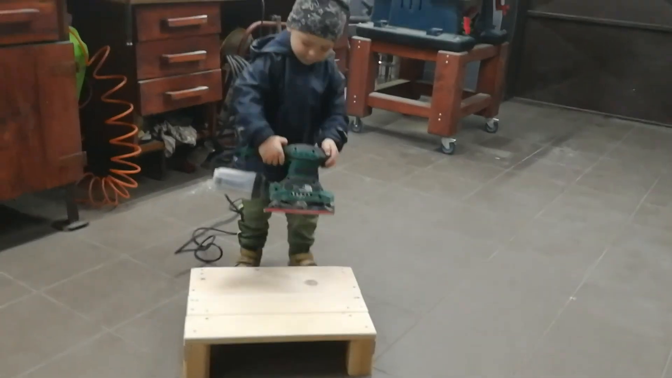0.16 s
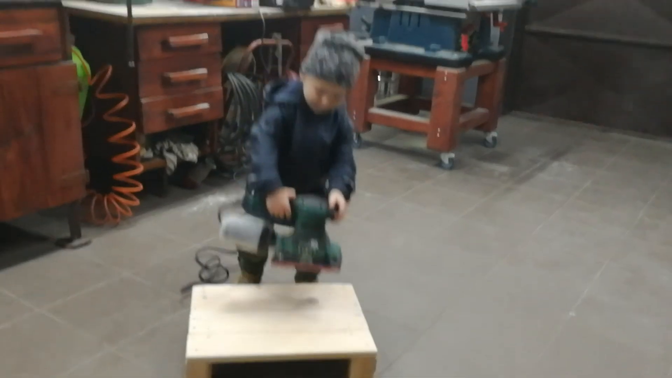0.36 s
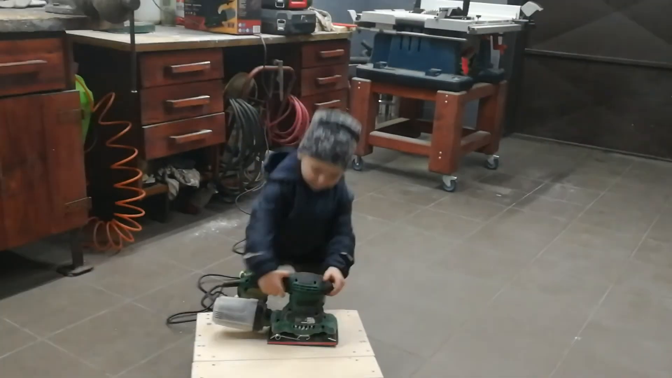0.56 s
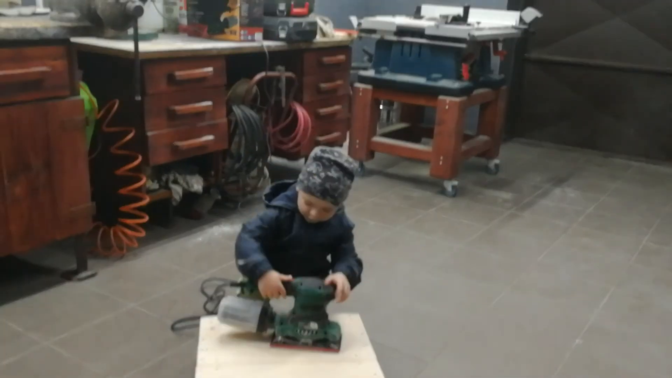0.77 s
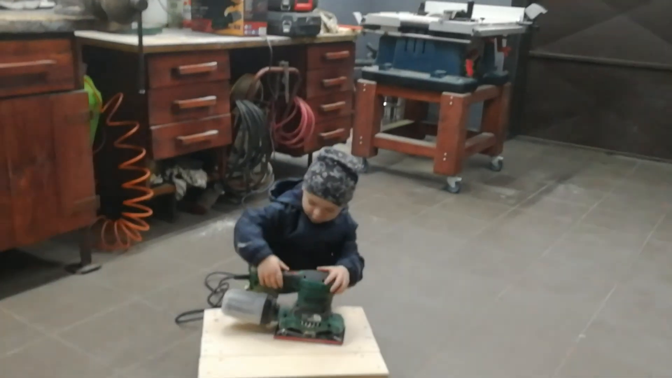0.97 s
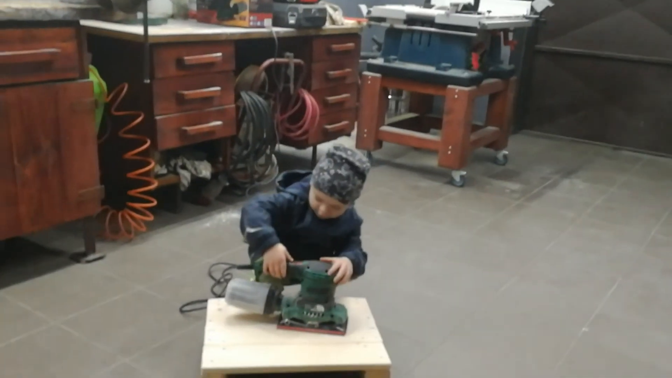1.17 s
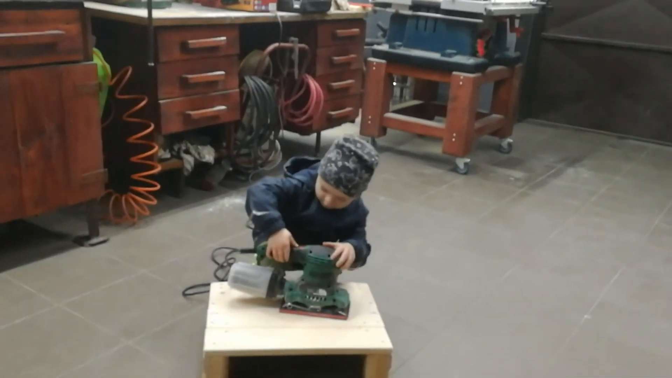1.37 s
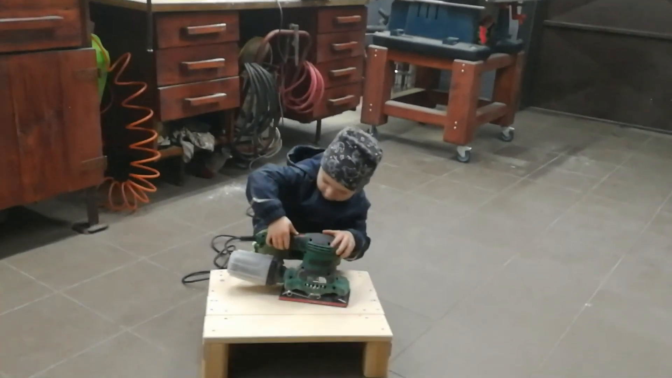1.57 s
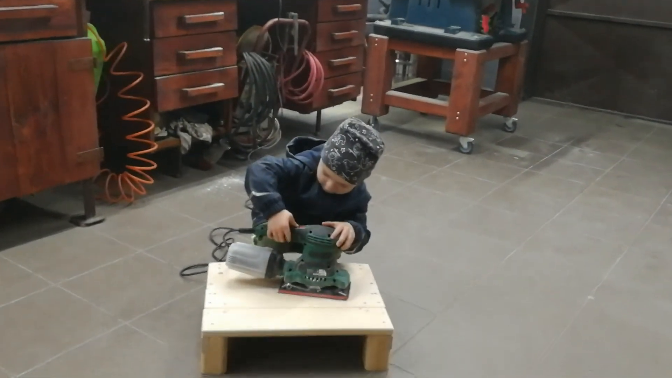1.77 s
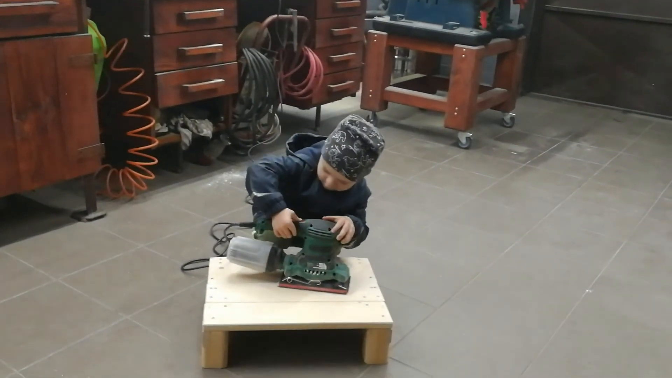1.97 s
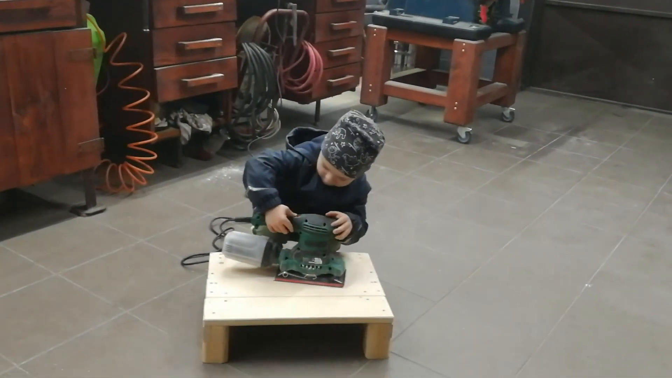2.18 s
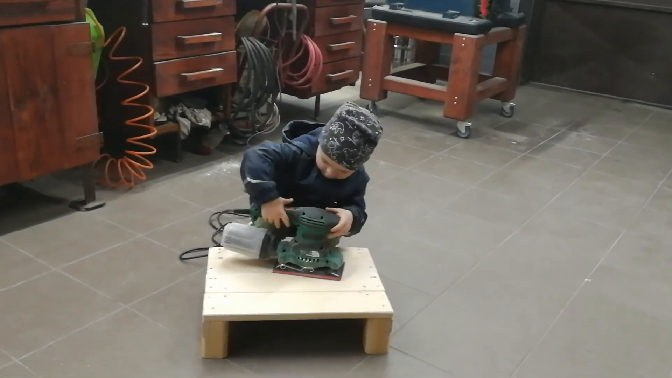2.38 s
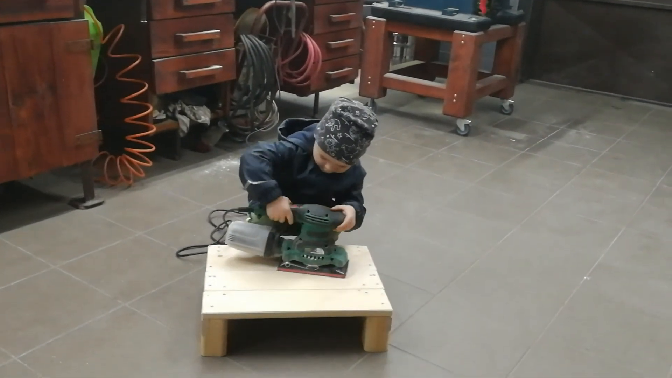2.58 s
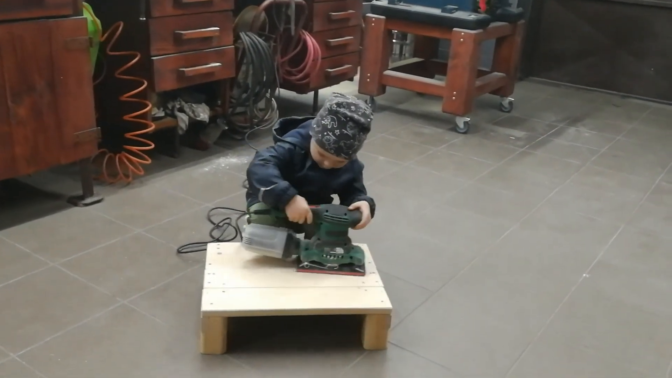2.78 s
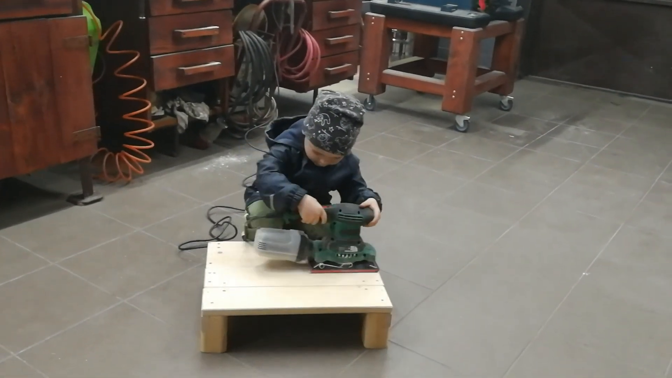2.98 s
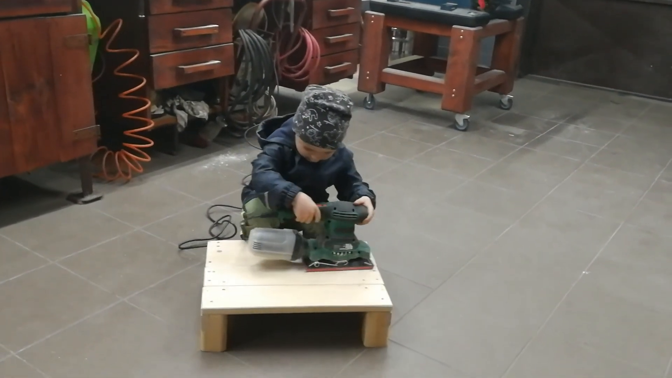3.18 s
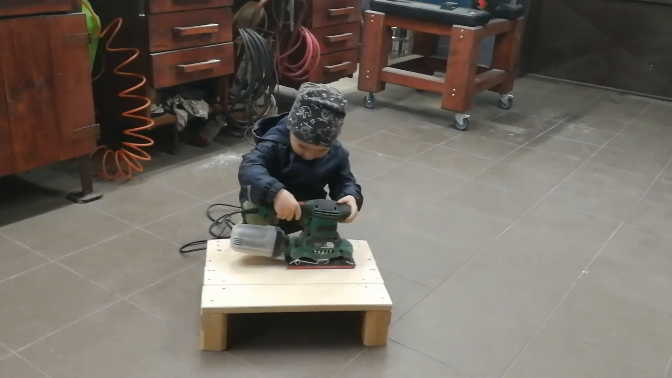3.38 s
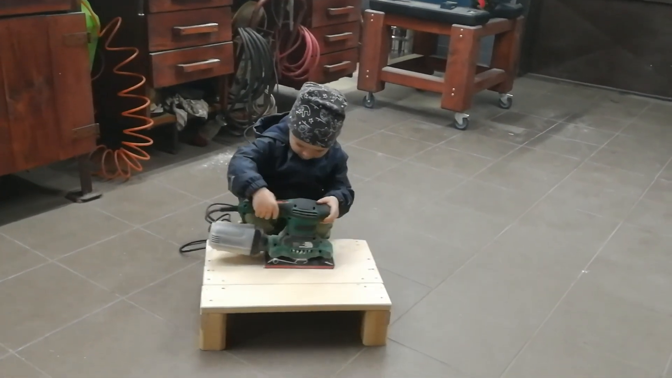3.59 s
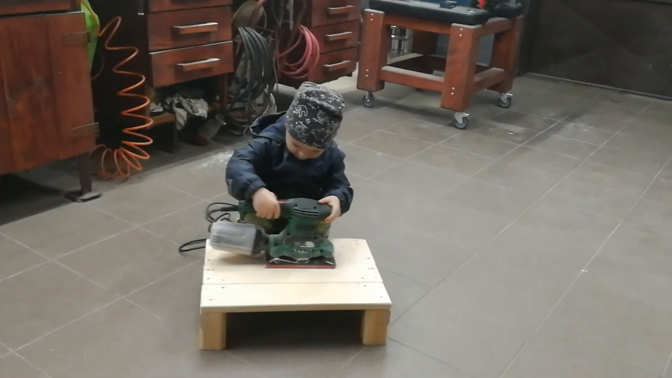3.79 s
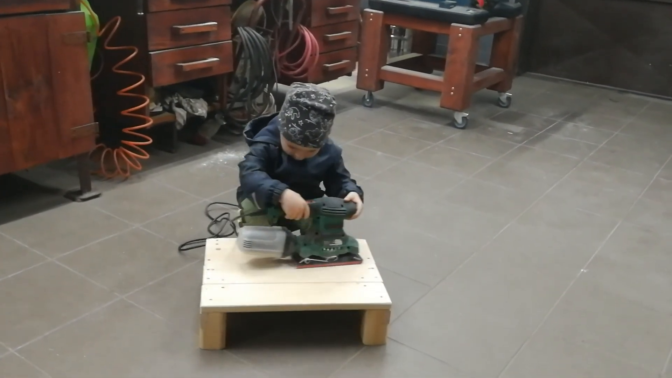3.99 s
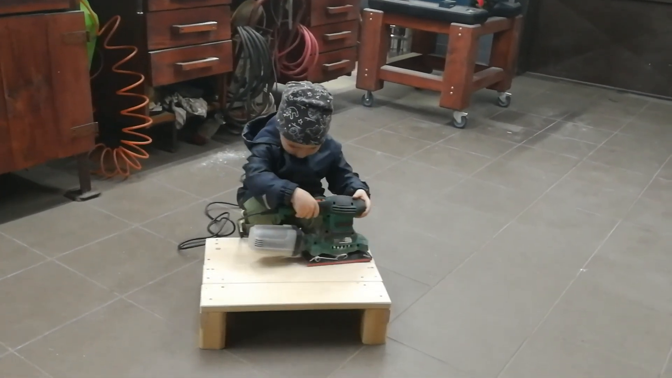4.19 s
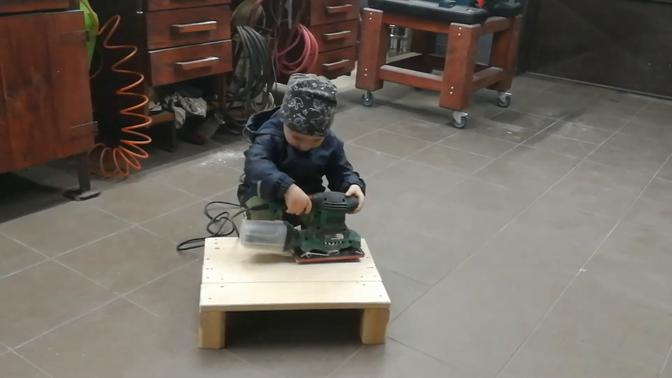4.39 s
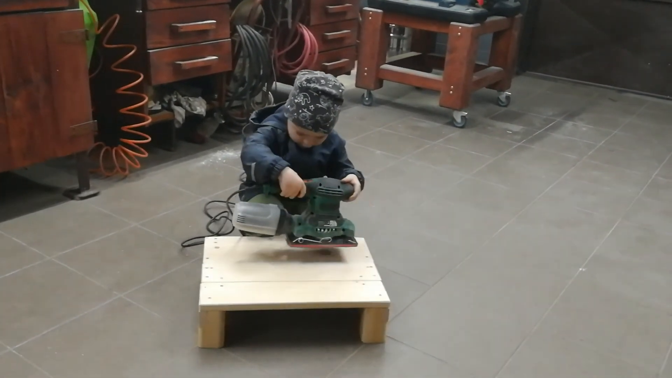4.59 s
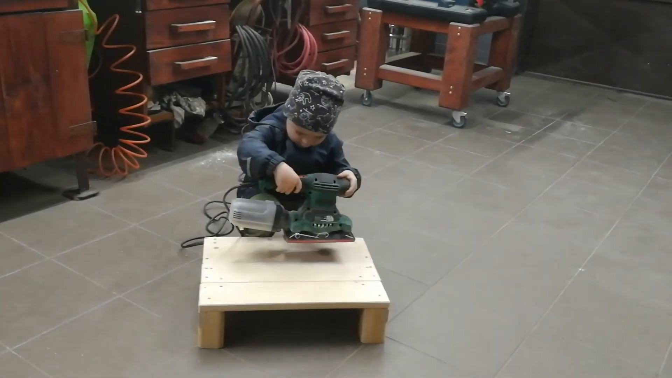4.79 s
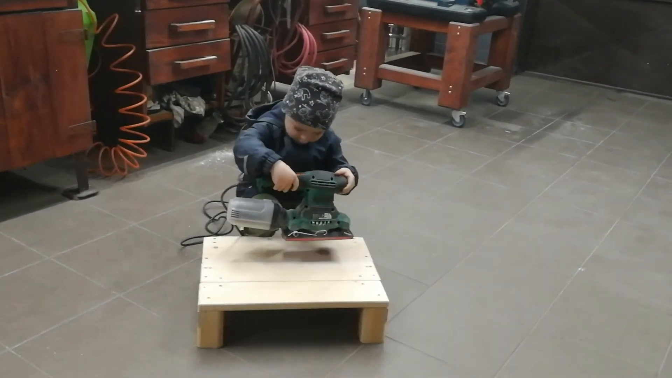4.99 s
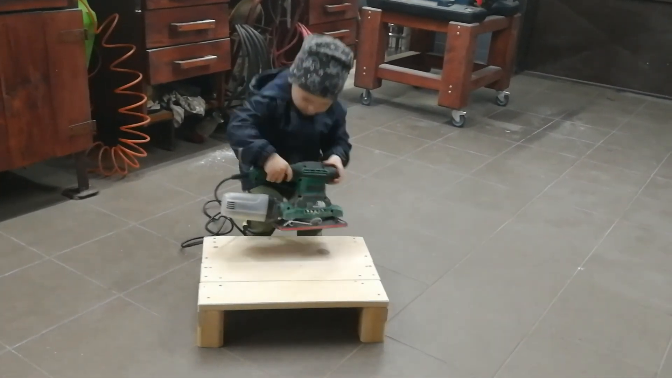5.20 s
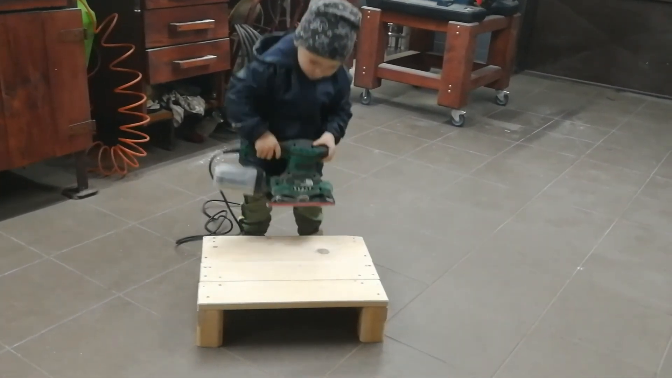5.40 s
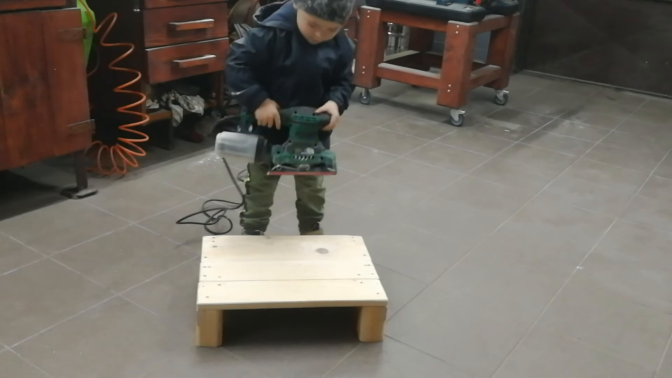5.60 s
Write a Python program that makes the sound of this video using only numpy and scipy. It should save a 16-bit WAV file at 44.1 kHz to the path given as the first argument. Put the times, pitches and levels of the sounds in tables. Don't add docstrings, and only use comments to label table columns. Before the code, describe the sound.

A phone about two metres away hears a jacket rustle, a small tap, then a power sander set on wood with a clack and hollow thud ringing in a tiled room. Quiet air follows. A crisp switch snap starts an uneven, clattering run-up that smooths into a bright, gritty buzz climbing in pitch. Once raised off the wood, the motor whirs freer and higher with a metallic rattle.

```python
import sys
import numpy as np
from scipy import signal
from scipy.fft import rfft, irfft
from scipy.io import wavfile
from scipy.ndimage import uniform_filter1d, map_coordinates

SR = 44100
rng = np.random.default_rng(int(sys.argv[2]) if len(sys.argv) > 2 else 0)


def inscribe(sig):
    pcm = np.round(np.clip(np.atleast_2d(sig).T, -1, 1) * 32767)
    wavfile.write(sys.argv[1], SR, pcm.astype(np.int16))


def attenuation_scalar(level_db):
    decades = np.asarray(level_db, float) / 20
    return 10 ** decades


N = 248724

# frequency in Hz, level in dB.
SNAP_SPECTRUM = [(120, -64.5), (200, -5.5), (401, -56), (762, -8), (1000, -17), (1480, 2), (1980, -7.5),
                 (2290, -1.5), (5520, -8), (8730, 0), (16000, -23.5)]
# frequency in Hz, level in dB.
SLAP_SPECTRUM = [(400, -26), (800, -8), (1200, -2), (1500, 0), (2000, -5), (3000, -18), (8000, -19),
                 (12000, -36)]
# frequency in Hz, level in dB.
SHOE_SPECTRUM = [(180, -35.5), (300, -2.5), (491, -14.5), (697, 2), (1450, -2), (2070, -3), (3500, -8.5),
                 (4550, -36), (7700, -120)]
# frequency in Hz, left-right coherence from 0 to 1.
COHERENCE = [(60, 0.98), (130, 0.99), (290, 0.89), (640, 0.43), (1400, 0.31), (3000, 0.045), (6500, 0.48),
             (10000, 0.13), (15000, 0.13)]


def motor():
    # time in seconds, shaft speed in Hz.
    run_up = [(2.0, 30.75), (2.18, 48.92), (2.3, 64.69), (2.39, 68.54), (2.49, 74.7), (2.58, 86.2),
              (2.7, 92.96), (2.81, 100.1), (2.9, 103.3), (3.01, 106.4), (3.33, 113.6), (3.58, 117.2),
              (3.9, 119.7), (4.28, 121.2), (4.43, 124), (4.52, 127.1), (4.9, 134.2), (5.2, 136.5),
              (5.64, 139.1)]
    t = np.arange(N) / SR
    speed = curve(run_up, 1, before=0)
    turns = np.cumsum(speed * (1 + 0.0009 * slow(30))) / SR
    lift_s, lift_fade_s = 4.33, 0.048
    lifted = .5 + .5 * np.tanh((t - lift_s) / lift_fade_s)
    wake_s, wake_db_per_s = 2.103, 100
    wake_db = -wake_db_per_s * np.maximum(wake_s - t, 0) - 60 * (t < 1.9)
    settled_db = -20 * np.clip((2.62 - t) / .12, 0, 1) + wake_db
    seated_s, seating_db_per_s = 3.11, 22
    blur_db = -seating_db_per_s * np.maximum(seated_s - t, 0)
    steady_db = settled_db + blur_db
    out = low_orders(turns, lifted, settled_db, blur_db)
    out += commutator(turns, speed, lifted, settled_db)
    out += high_orders(turns, steady_db)
    out += pad_chatter(turns, lifted, steady_db)
    out += pad_hops(turns)
    out += housing(turns, lifted, wake_db)
    out += fan(turns, speed, lifted, wake_db)
    out += paper_rasp(turns)
    out += paper_clamp(turns)
    return signal.sosfilt(signal.butter(4, 58, "high", fs=SR, output="sos"), out)


def low_orders(turns, lifted, settled_db, blur_db):
    on_wood_db = [-60.5, -50.5, -58.5, -57.5, -56, -50.5]
    in_air_db = [-53, -64, -60.5, -63.5, -61, -53.5]
    # time in seconds, peak in dB, rise in seconds, fall in seconds if other.
    passages = [
        [(2.37, -48, 0.3, 0.1), (2.5, -49, .16, 0.15), (3.5, -42, 0.16, .2), (4.45, -47.5, 0.28, 0.2),
         (4.82, -38.5, .2), (5.5, -42.5, 0.16, 0.3)],
        [(3, -36.5, .07, 0.09), (3.06, -43, 0.13), (3.33, -35, 0.12, 0.08), (4, -32.5, .36, .15),
         (4.86, -52, 0.18)],
        [(2.75, -45, 0.044), (3.37, -46.5, .08), (3.6, -51, .06), (3.89, -35.5, 0.09, .25), (5, -45, 0.15, 0.2),
         (5.434, -44.5, .22)],
        [(2.62, -46.5, 0.12), (2.87, -45, 0.043), (3.47, -46, .12), (5.5, -39, 0.26)],
        [(3.22, -52, 0.096), (3.96, -47.5, 0.085), (4.19, -41, 0.18, 0.13), (5.48, -48.5, .25)],
        [(3.4, -46, 0.24), (3.95, -44.5, 0.082), (4.33, -46, .09), (4.6, -44, 0.043), (4.9, -40, 0.24),
         (5.17, -45.5, 0.11), (5.5, -33.5, 0.27)],
    ]
    out = np.zeros((2, N))
    for k, spread in enumerate([0.16, 0.88, 0.88, .45, .42, .32]):
        rest_db = on_wood_db[k] + (in_air_db[k] - on_wood_db[k]) * lifted + settled_db
        rest_db = rest_db + blur_db * (k > 3)
        gain = attenuation_scalar(rest_db + 2.0 * slow(7.8)) + swells(passages[k])
        out += gain * tone(turns, k + 1, -.5, spread=spread, lean=.6)
    return out


def commutator(turns, speed, lifted, settled_db):
    # time in seconds, level in dB, half width in seconds.
    strain = [(2.61, -53, .04), (2.76, -51, .04), (2.87, -54, .07), (3.25, -54.5, 0.23), (4.0, -50, 0.23),
              (4.5, -51, 0.074), (4.75, -50, .1), (5.05, -45, 0.11), (5.3, -49, .06), (5.53, -48, .1)]
    wood_db, air_db = -50, -45.5
    bars_db = wood_db + (air_db - wood_db) * lifted + .5 * settled_db
    bars_db = 20 * np.log10(attenuation_scalar(bars_db) + swells(strain))
    whine = tone(turns + .006 * slow(35), 24, bars_db - 2.5 + 2 * slow(30), spread=.3)
    sparks = resonate(rng.standard_normal((2, N)), 24 * speed, 47)
    return whine + attenuation_scalar(bars_db - 4 + 3 * np.cos(2 * np.pi * turns)) * evened(sparks)


def high_orders(turns, steady_db):
    # multiple of shaft speed, relative level in dB.
    orders = [(7, -17), (8, -15.5), (9, -18), (10, -16), (11, -15), (12, -14.5), (13, -17), (14, -16),
              (15, -17.5), (16, -17), (17, -18), (18, -22), (19, -20), (22, -20), (23, -18), (25, -18)]
    # multiple of shaft speed, time in seconds, level in dB, half width in seconds.
    all_flares = [(7, 3.22, -48, .13), (7, 3.96, -50, .2), (7, 4.75, -51, .05), (7, 5.2, -53, 0.11),
                  (7, 5.55, -46.5, .13), (8, 3.14, -52.5, .2), (8, 3.95, -49, .06), (8, 4.5, -51, .1),
                  (8, 5.45, -46.5, .2), (9, 3.08, -55, .12), (9, 3.95, -52, 0.055), (9, 4.2, -51.5, .12),
                  (9, 5.5, -53, .08), (10, 3.95, -49, .08), (10, 4.17, -52, .1), (11, 3.12, -54, .1),
                  (11, 3.8, -50.5, 0.29), (11, 5.5, -53, .2), (12, 3.05, -55, .06), (12, 3.42, -52.5, .17),
                  (12, 4.1, -54.5, .25), (12, 4.47, -47, .08), (12, 5.4, -48, .2), (13, 3.8, -52, .06),
                  (13, 5.15, -52, .06), (14, 3.3, -52, 0.055), (14, 4.9, -53, .06), (14, 4.85, -52, 0.055),
                  (14, 5.04, -50, .06), (15, 4.42, -49, .1), (16, 3.2, -52, .1), (16, 5.5, -52, 0.23),
                  (17, 4.37, -48, 0.065), (17, 4.8, -50, .15), (18, 5.7, -48, .1), (19, 5.25, -45, .14),
                  (19, 6.2, -51, .05), (22, 4.95, -52, .08), (22, 5.58, -49, .13), (23, 2.75, -51, .12),
                  (23, 5.6, -52, .12), (23, 5.17, -52, .06), (23, 5.55, -49, .12), (25, 2.75, -54, .1),
                  (25, 5.13, -49, 0.14), (25, 5.5, -58, .08)]
    base_db = -48
    rest = attenuation_scalar(0.5 + steady_db)
    out = np.zeros((2, N))
    for order, db in orders:
        flares = swells([row[1:] for row in all_flares if row[0] == order])
        gain = rest * attenuation_scalar(base_db + db) + flares
        out += gain * tone(turns + .008 * slow(30), order, 2 * slow(20) - .5, spread=.3)
    return out


def pad_chatter(turns, lifted, steady_db):
    # time in seconds, level in dB, half width in seconds.
    loud_spells = [
        (3.2, -1, .2),
        (3.96, 2, .09),
        (5.58, -1, 0.28),
    ]
    level_db, ring_hz, width_hz = -52, 1100, 610
    hz = np.full(N, ring_hz)
    rap = resonate(knocks(turns, spread_db=1.5, jitter=0.0091), hz, width_hz)
    rap = resonate(rap, hz, width_hz)
    gain = 0.27 * (1 - lifted) * attenuation_scalar(0.5 + steady_db) + swells(loud_spells)
    return gain * attenuation_scalar(level_db) * evened(rap)


def pad_hops(turns):
    # landing time in seconds, level in dB.
    landings = [(2.009, -13), (2.047, -0.5), (2.084, -3), (2.106, 1.5), (2.128, -3), (2.154, -1),
                (2.176, 1), (2.2, -2.5), (2.22, -1), (2.245, -1.5), (2.275, -5), (2.316, -0.5), (2.353, -2),
                (2.372, -2), (2.405, -0.5), (2.469, -4), (2.5, -4), (2.588, -2)]
    # start in seconds, length in seconds, level in dB.
    hopping = [
        (2.06, .4, -45),
        (2.08, .14, -46),
    ]
    hops = table_ring(knocks(turns, spread_db=3.5, jitter=0.24))
    hops /= np.sqrt(uniform_filter1d(hops ** 2, 6000) + 1e-9)
    drops = np.zeros(N)
    for s, db in landings:
        drops[round(s * SR)] = attenuation_scalar(db - 9)
    drops = table_ring(drops) + 0.72 * spells(hopping, db_per_s=500) * hops
    return drops + 0.45 * room(drops)


def housing(turns, lifted, wake_db):
    # frequency in Hz, level in dB per Hz.
    rattle = [(35, -46.5), (60, -55), (145, -62), (195, 2.5), (310, -0.5), (355, 4.5), (488, -10), (585, 0),
              (900, 0), (1170, -37), (1980, -120)]
    # frequency in Hz, level in dB.
    shell_buzz = [(180, -22), (300, -14), (373, -5.5), (468, -11.5), (562, -10.5), (699, -1), (1100, -2.5),
                  (1770, 2), (1940, 0.5), (4000, -5.5), (5200, -9.5), (8800, -120)]
    # start in seconds, length in seconds, level in dB.
    shaking = [
        (2.14, 0.4, -45.5),
        (2.36, .13, -46),
    ]
    # start in seconds, length in seconds, level in dB.
    scraping = [
        (2.355, 0.035, -41.5),
        (2.42, 0.074, -42),
    ]
    shake_wood_db, shake_air_db = -55, -61.5
    buzz_wood_db, buzz_air_db = -42.5, -40
    steady_shake = attenuation_scalar(shake_wood_db + (shake_air_db - shake_wood_db) * lifted + wake_db)
    out = (spells(shaking, db_per_s=148.0) + steady_shake) * noise(rattle, patchy_db=3.5)
    throb_db = 0.86 * np.cos(2 * np.pi * turns)
    buzz = attenuation_scalar(buzz_wood_db + (buzz_air_db - buzz_wood_db) * lifted + wake_db + throb_db)
    out += buzz * noise(shell_buzz, patchy_db=2.5)
    return out + spells(scraping, db_per_s=200) * noise(SLAP_SPECTRUM, patchy_db=2)


def fan(turns, speed, lifted, wake_db):
    # frequency in Hz, level in dB.
    flow = [(1500, -22), (2500, 4), (3500, 3), (5000, 0), (6500, -1), (8500, 7), (10500, -23), (16000, -39)]
    wood_db, air_db, db_per_octave = -40.5, -36.5, 0.5
    level_db = wood_db + (air_db - wood_db) * lifted
    level_db = level_db + db_per_octave * np.log2(np.maximum(speed, 30) / 120)
    return attenuation_scalar(level_db + wake_db + .7 * np.cos(2 * np.pi * turns)) * noise(flow, patchy_db=1.5)


def paper_rasp(turns):
    # time in seconds, level in dB.
    bite = [(1.93, -67), (2.02, -57), (2.13, -43), (2.5, -42), (2.62, -31.5), (2.95, -32.5), (3.25, -35),
            (3.55, -31.5), (4.0, -32), (4.28, -34.5), (4.36, -45), (5.64, -40.5)]
    # time in seconds, level in dB, rise in seconds, fall in seconds.
    scuffs = [(2.073, -41, .002, 0.0092), (2.099, -40, .002, .01), (2.137, -39, .003, .012),
              (2.157, -37, .002, 0.013), (2.27, -39, 0.023, .03), (2.32, -38, .006, .02),
              (2.376, -36.5, 0.0046, 0.018), (2.416, -39, .003, .015), (2.451, -37, .003, .015),
              (2.489, -36, .003, 0.017), (2.532, -35.5, .003, 0.018), (2.567, -35.5, 0.0027, 0.013)]
    # frequency in Hz, level in dB.
    rasp = [(2940, -22), (5000, -10), (6310, -9), (8500, 2), (10800, -15.5), (12500, -12), (14200, -15.5),
            (15200, -17.5), (16000, -27)]
    grit_db = 1.18 * evened(uniform_filter1d(rng.standard_normal(N), 100))
    stroke_db = 0.7 * np.cos(2 * np.pi * turns)
    gain = attenuation_scalar(curve(bite, 1)) + swells(scuffs, bend=0.98)
    return gain * attenuation_scalar(stroke_db + grit_db) * noise(rasp, patchy_db=-0.5)


def paper_clamp(turns):
    # start in seconds, length in seconds, level in dB, ring in Hz.
    ticking = [
        (4.335, 0.06, -45.5, 1990),
        (4.425, 0.099, -47, 1700),
        (5.078, 0.11, -43.5, 2420),
        (5.205, .15, -44.5, 2300),
        (5.4, .03, -42.5, 2250),
        (5.51, 0.11, -43, 2250),
    ]
    width_hz = 520
    ticks = knocks(turns, spread_db=3.0, jitter=.04) + 0.055 * rng.standard_normal((2, N))
    starts, *_, rings_hz = np.transpose(ticking)
    current = np.maximum(np.searchsorted(starts, np.arange(N) / SR) - 1, 0)
    hz = rings_hz[current] * (1 + .025 * slow(25))
    ring = resonate(resonate(ticks, hz, width_hz), hz, width_hz)
    return spells(ticking) * attenuation_scalar(1.2 * slow(35)) * evened(ring)


def hits():
    # time in seconds, peak in dB.
    clip_ticks = [
        (.192, -58),
        (.532, -28),
    ]
    down, touches, switch, slaps = landing(), light_touches(), switch_click(), first_slaps()
    wet = room(attenuation_scalar(-0.5) * down + attenuation_scalar(-3.5) * touches + attenuation_scalar(4) * switch + attenuation_scalar(2.5) * slaps)
    wet = wet + bursts(clip_ticks, SNAP_SPECTRUM, .004)
    direct = attenuation_scalar(-2.5) * (down + touches) + attenuation_scalar(4.5) * switch + attenuation_scalar(3.0) * slaps
    return (direct + wet) * attenuation_scalar(np.array([[-1.5], [1.5]]))


def landing():
    # time in seconds, peak in dB, dullness as a filter pole, burst length in seconds.
    contacts = [
        (0.537, -25.5, 0.3, 0.0018),
        (0.556, -6, 0.3, 0.0021),
        (0.562, -5.5, 0.27, 0.0015),
        (0.57, -13, 0.27, 0.0025),
    ]
    # frequency in Hz, level in dB.
    thud = [(35, -48), (60, -27.5), (109, -36.5), (203, -14.5), (413, -9.5), (589, -17.5), (897, 7.5),
            (1070, -3.5), (1530, 1), (2130, -5.5), (2780, -18), (8050, -40.5), (12000, -46), (15600, -76.5),
            (22000, -120)]
    weight = np.zeros(N)
    weight[round(contacts[0][0] * SR)] = 1
    return bursts(contacts, thud) + attenuation_scalar(-23) * table_ring(uniform_filter1d(weight, 60) * 8)


def light_touches():
    # time in seconds, peak in dB.
    corner = [
        (0.464, -21.5),
        (0.473, -26),
        (0.482, -30),
        (0.492, -29.5),
        (0.503, -29),
        (0.517, -29),
        (.548, -27),
    ]
    # frequency in Hz, level in dB.
    corner_spectrum = [(300, -22), (700, -17.5), (1000, -10.5), (1500, -8.5), (2050, 1), (2500, -10.5),
                       (4200, -16), (5500, -34), (12000, -38)]
    # time in seconds, peak in dB.
    taps = [
        (0.191, -51),
        (0.254, -60),
        (0.44, -31),
        (.444, -34),
    ]
    return bursts(corner, corner_spectrum, 0.0018) + bursts(taps, SHOE_SPECTRUM, 0.0012)


def switch_click():
    # time in seconds, peak in dB.
    snaps = [
        (1.875, -18.5),
        (1.878, -15.5),
        (1.881, -16.5),
    ]
    return bursts(snaps, SNAP_SPECTRUM, 0.001)


def first_slaps():
    # time in seconds, peak in dB.
    slaps = [(2.004, -33), (2.042, -26.5), (2.072, -25.5), (2.099, -23), (2.123, -24), (2.146, -30),
             (2.236, -27.5), (2.288, -30), (2.297, -30), (2.318, -28.5), (2.358, -28), (2.368, -28),
             (2.379, -25), (2.387, -29), (2.417, -27), (2.427, -25), (2.455, -24.5), (2.462, -30),
             (2.487, -30), (2.505, -30), (2.53, -31)]
    return bursts(slaps, SLAP_SPECTRUM, 0.00037)


def hums():
    # frequency in Hz, level in dB, decay by 60 dB in seconds.
    modes = [(66, -14.5, .5), (186, -5, .85), (191, -6, .85), (240, -8, .3), (280, -2, .64),
             (340, -3, 0.65), (401, -2.5, 0.6)]
    # time in seconds, level in dB, rise in seconds, fall in seconds.
    footfall = [
        (1.37, -61, .07, .11),
    ]
    # frequency in Hz, level in dB.
    floor_modes = [(68, 0), (118, -8)]
    boom_s, boom_db = .545, -34.5
    t = np.arange(N) / SR
    after = np.maximum(t - boom_s, 0)
    boom = sum(attenuation_scalar(db - 60 * after / t60) * np.sin(2 * np.pi * hz * after) for hz, db, t60 in modes)
    step = sum(attenuation_scalar(db) * np.sin(2 * np.pi * hz * t) for hz, db in floor_modes)
    return attenuation_scalar(boom_db) * np.minimum(after / 0.027, 1) * boom + swells(footfall) * step


def background():
    # time in seconds, peak in dB, rise and fall in seconds per 10 dB.
    jacket = [
        (0, -56.5, .01, 0.07),
        (.28, -62.5, 0.09, 0.28),
        (.452, -53, 0.0096, 0.09),
        (.533, -40, .001, 0.05),
        (.75, -57.5, .3, .04),
        (.9, -73, 0.09, 0.2),
    ]
    # frequency in Hz, level in dB.
    rustle = [(1180, -44), (2000, -25), (2140, -26), (2710, -0.5), (6250, 0), (8930, 6), (10700, -10.5),
              (16000, -12)]
    # time in seconds, peak in dB, rise and fall in seconds per 10 dB.
    shoes = [
        (.262, -63, 0.12, 0.17),
        (.56, -71, 0.43, 0.56),
        (1.1, -75, .1, 0.23),
        (1.8, -81, 0.57, .5),
    ]
    # time in seconds, peak in dB, rise and fall in seconds per 10 dB.
    grip = [
        (.05, -76, 0.033, 0.15),
        (.56, -60.5, 0.086, .15),
        (.98, -78.5, 0.045, 0.052),
        (1.4, -75, .08, .16),
    ]
    # frequency in Hz, level in dB.
    rumble = [(20, -11), (40, 2.5), (70, 9.5), (120, 0), (250, -30)]
    # start in seconds, length in seconds, level in dB.
    creeps = [
        (1.59, 0.1, -69),
        (1.74, 0.13, -70),
    ]
    # frequency in Hz, level in dB.
    still_air = [(15, -25), (25, -3), (49, -17.5), (256, -7), (476, -21), (530, -10), (607, -29),
                 (886, -17.5), (6380, -22), (8360, -19), (10100, -28), (14700, -31), (16000, -25)]
    thumb_hz, thumb_width_hz, air_db = 2060, 310, -68.5
    clothes = swells(jacket, bend=1) * noise(rustle, patchy_db=2)
    feet = swells(shoes, bend=0.69) * noise(SHOE_SPECTRUM, patchy_db=4.5)
    hand = swells(grip, bend=1) * noise(rumble, patchy_db=1.5)
    hz = np.full(N, thumb_hz)
    creep = resonate(rng.standard_normal((2, N)), hz, thumb_width_hz)
    creep = resonate(creep, hz, thumb_width_hz)
    thumb = spells(creeps) * attenuation_scalar(2.5 + 2 * slow(31.06)) * evened(creep)
    return clothes + feet + hand + thumb + attenuation_scalar(air_db) * noise(still_air, patchy_db=2.0)


def table_ring(x):
    # frequency in Hz, level in dB, decay by 60 dB in seconds.
    modes = [(197, -0.5, 0.41), (238, -3.5, .15), (280.4, -7, .2), (344, -9, .15), (404, -12.5, .12),
             (600, -14, .08)]
    t = np.arange(12000) / SR
    ring = sum(attenuation_scalar(db - 60 * t / t60) * np.sin(2 * np.pi * hz * t) for hz, db, t60 in modes)
    ring = signal.sosfilt(signal.butter(6, 175, "high", fs=SR, output="sos"), ring)
    return signal.oaconvolve(x, ring / np.linalg.norm(ring))[..., :N]


def room(x, early_db=-6):
    # frequency in Hz, decay by 60 dB in seconds.
    decay = [(100, .7), (200, .7), (330, .5), (700, .5), (1840, .47), (4850, .55)]
    taps = np.zeros((2, SR))
    at = np.arange(500, SR - 20, 20) + rng.integers(0, 20, (2, (SR - 501) // 20))
    np.put_along_axis(taps, at, rng.choice([-1., 1.], at.shape), 1)
    hz, t, z = signal.stft(taps, SR, nperseg=512)
    t60 = np.clip(read(decay, hz), .1, 2)[:, None]
    tail = signal.istft(z * attenuation_scalar(-60 * t / t60), SR, nperseg=512)[1]
    tail[:, :200] = 0
    size = tail.shape[1]
    same = np.clip(read(COHERENCE, np.fft.rfftfreq(size, 1 / SR)), 0, 1)
    tail[1] = irfft(same * rfft(tail[0]) + np.sqrt(1 - same ** 2) * rfft(tail[1]), size)
    tail /= np.linalg.norm(tail[0])
    tail[:, rng.integers(150, 700, 6)] += attenuation_scalar(early_db) * rng.uniform(-0.47, 0.81, (2, 6))
    return signal.fftconvolve(x[None], tail, axes=1)[:, :N]


def tone(turns, order, db, spread=0.61, lean=0.):
    sides = np.array([[1], [-1]])
    apart = np.clip(spread * min(order, 5) / 3 * (lean + slow(2.5)), -.8, .8)
    tilt = 1 + 0.065 * spread * slow(0.52) * sides
    angle = 2 * np.pi * (order * turns + rng.random())
    return np.sqrt(2) * attenuation_scalar(db) * tilt * (np.sin(angle) + np.tan(apart) * np.cos(angle) * sides)


def knocks(turns, spread_db, jitter):
    late = np.maximum.accumulate(turns + jitter * slow(39))
    struck = np.diff(np.floor(late), prepend=0) > 0
    return struck * attenuation_scalar(spread_db * rng.standard_normal(N))


def bursts(rows, spectrum, length=.003):
    drive = np.zeros(N)
    for s, db, *shape in rows:
        u = np.arange(2000) / SR / max(shape[1] if shape else length, 1e-4)
        jolt = rfft(rng.standard_normal(len(u)) * np.sqrt(u) * np.exp(-u))
        flat_jolt = irfft(jolt / abs(jolt)) * np.exp(-u / 6)
        crack = signal.oaconvolve(flat_jolt, colour(spectrum))
        if shape:
            crack = signal.lfilter([1], [1, -np.clip(shape[0], -.9, .95)], crack)
        drive[round(s * SR):][:len(crack)] += attenuation_scalar(db) * crack / abs(crack).max()
    return drive


def colour(spectrum, size=2048):
    level_db = read(spectrum, abs(np.fft.fftfreq(size, 1 / SR)))
    gain = np.log(attenuation_scalar(np.maximum(level_db, -90)))
    h = np.fft.ifft(np.exp(np.conj(signal.hilbert(gain)))).real[:size // 2]
    return h / abs(h).max()


def noise(spectrum, patchy_db=-6.0):
    frames, hz = N // 128 + 9, np.fft.rfftfreq(512, 1 / SR)
    a, b, c, d, patches = rng.standard_normal((frames, 257, 5)).T
    patches = evened(uniform_filter1d(uniform_filter1d(patches, 5, 0), 20, 1))
    same = np.clip(read(COHERENCE, hz), -1, 1)[:, None]
    left = a + 1j * b
    right = same * left + np.sqrt(1 - same ** 2) * (c + 1j * d)
    z = np.array([left, right]) * attenuation_scalar(patchy_db * patches)
    flat = signal.istft(z, nperseg=512, noverlap=384)[1][:, :N]
    x = irfft(rfft(flat) * attenuation_scalar(read(spectrum, np.fft.rfftfreq(N, 1 / SR))), N)
    return x / np.sqrt(np.mean(x.mean(0) ** 2))


def resonate(x, hz, width):
    turn = np.exp(2j * np.pi * np.cumsum(hz) / SR)
    r = np.exp(-np.pi * width / SR)
    return 2 * (turn * signal.lfilter([1 - r], [1, -r], x / turn)).real


def swells(rows, bend=2):
    t = np.arange(0, N, 32) / SR
    gain = 0
    for s, db, *wide in rows:
        distance = abs((t - s) / np.where(t < s, wide[0], wide[-1]))
        gain = gain + attenuation_scalar(db - 10 * distance ** bend)
    return np.interp(np.arange(N) / SR, t, gain)


def spells(rows, db_per_s=400):
    t = np.arange(0, N, 32) / SR
    gain = 0
    for s, length, db, *_ in rows:
        outside = np.maximum(np.maximum(s - t, t - s - length), 0)
        gain = gain + attenuation_scalar(db - db_per_s * outside)
    return np.interp(np.arange(N) / SR, t, gain)


def slow(hz):
    knots = rng.standard_normal(int(N / SR * 40) + 4)
    coarse = np.arange(0, N + 64, 64)
    wander = map_coordinates(knots, [coarse / SR * min(hz, 39)], order=2)
    return np.interp(np.arange(N), coarse, wander)


def curve(rows, column, before=-120.):
    rows = np.array(rows)
    return np.interp(np.arange(N) / SR, rows[:, 0], rows[:, column], left=before)


def read(points, hz):
    f, value = np.transpose(points)
    return np.interp(np.log(hz + 1), np.log(f + 1), value)


def evened(x):
    return x / np.sqrt(np.mean(x ** 2) + 1e-20)


def scene():
    return motor() + hits() + hums() + background()


def roll_off(x):
    return signal.sosfilt(signal.butter(12, 15890, fs=SR, output="sos"), x)


def record(dry):
    # frequency in Hz, left minus right in dB.
    port_tilt = [(60, 1), (300, .5), (700, 3.5), (1100, -1.5), (1700, -2), (2400, -3), (3100, 0.5),
                 (5500, 0.5), (7200, 2), (8000, 9), (8700, 20), (9400, 12), (10700, 6.5), (12000, -7),
                 (13400, -11), (16000, -9)]
    left_lead = 2
    hz = np.fft.rfftfreq(N, 1 / SR)
    left_share = 1 / (1 + attenuation_scalar(-2 * read(port_tilt, hz)))
    ports = np.sqrt(2 * np.array([left_share, 1 - left_share])) + 0j
    ports[0] *= np.exp(2j * np.pi * hz * left_lead / SR)
    ports /= np.sqrt(1 + (hz / 15800) ** 400)
    mix = irfft(rfft(dry) * ports, N)
    return roll_off(mix)


dry = scene()
out = record(dry)
inscribe(out)
```